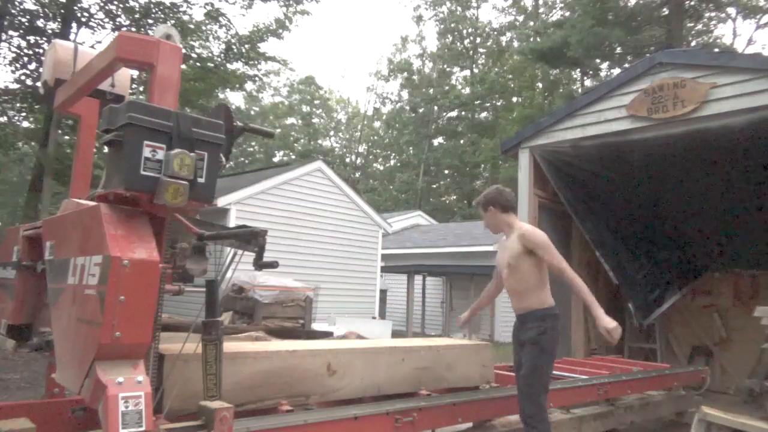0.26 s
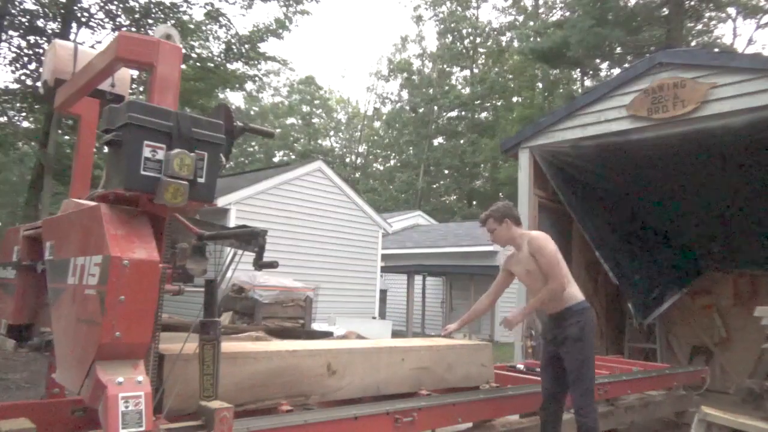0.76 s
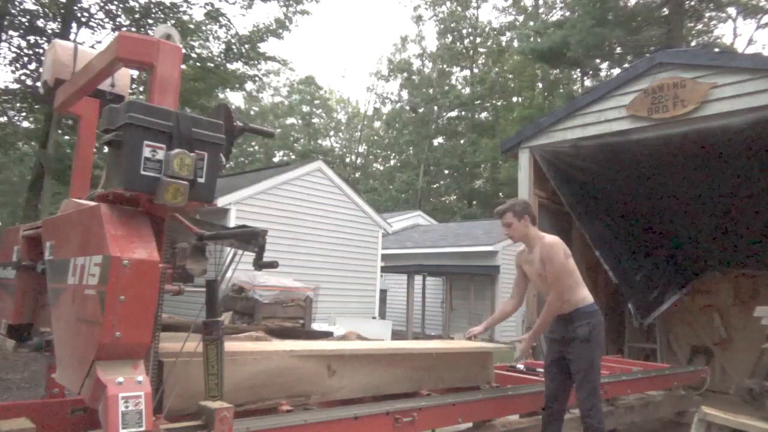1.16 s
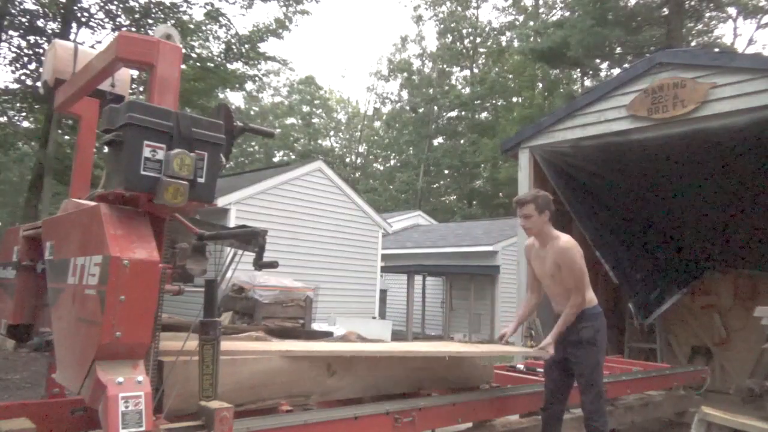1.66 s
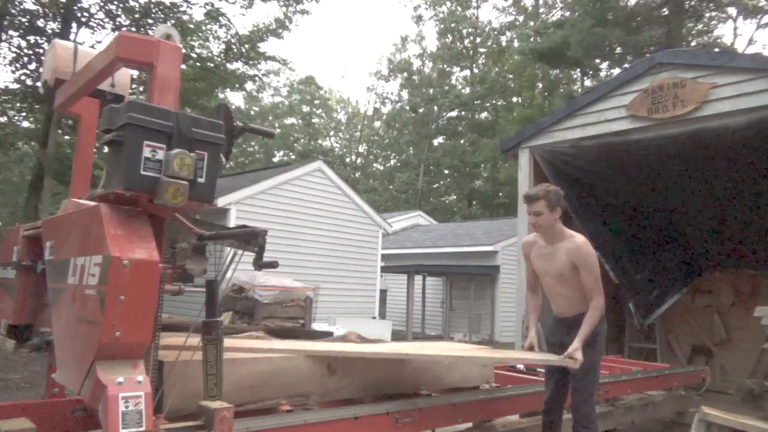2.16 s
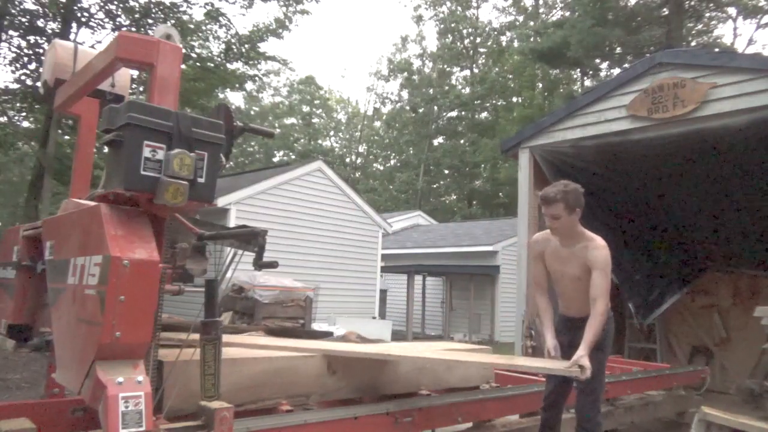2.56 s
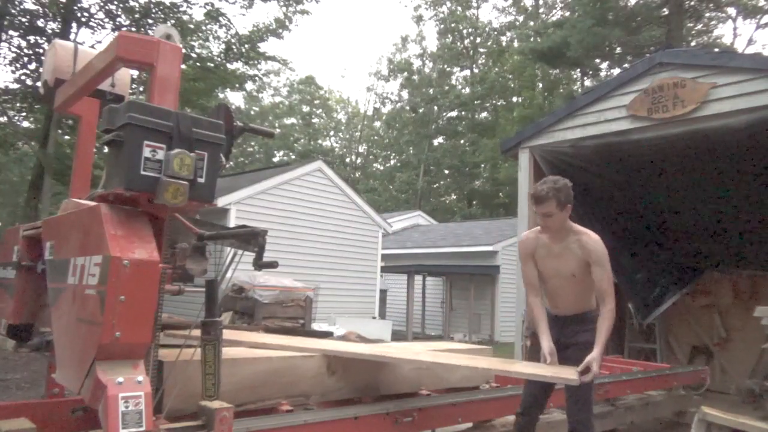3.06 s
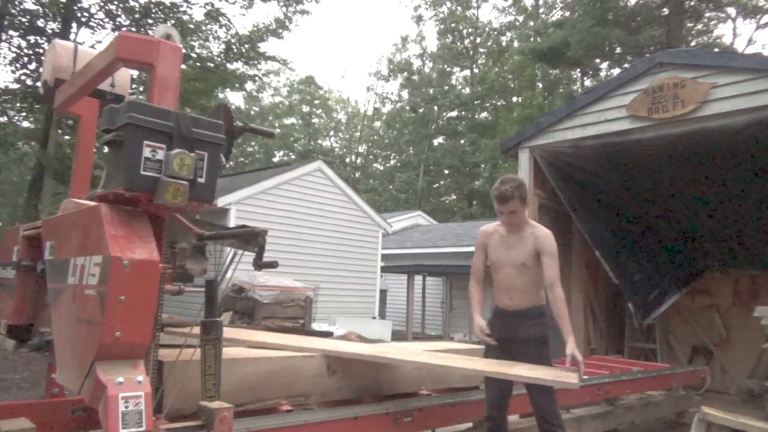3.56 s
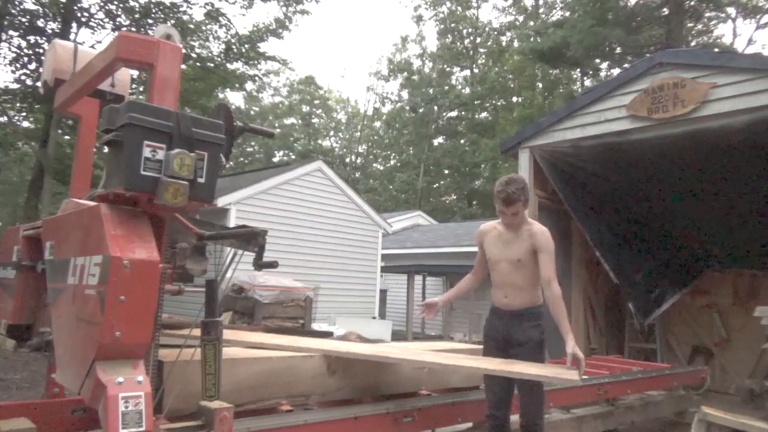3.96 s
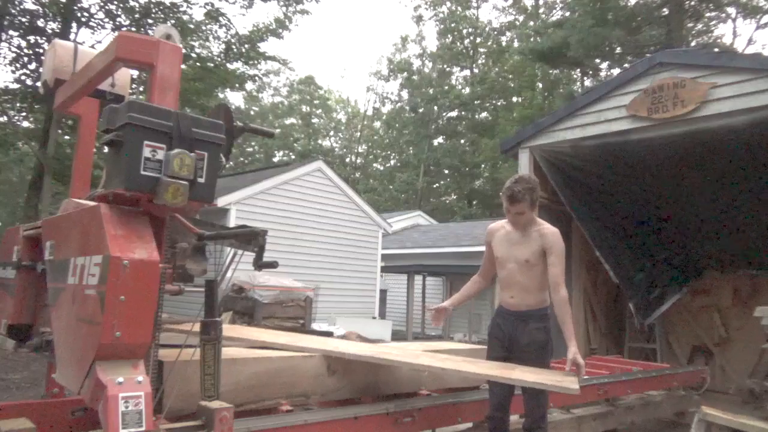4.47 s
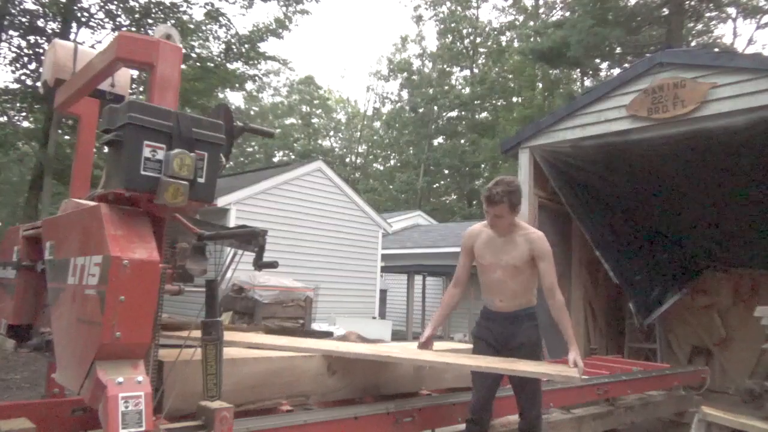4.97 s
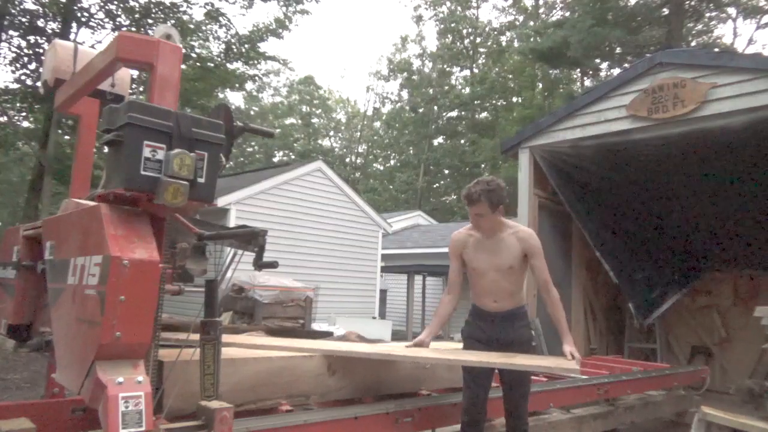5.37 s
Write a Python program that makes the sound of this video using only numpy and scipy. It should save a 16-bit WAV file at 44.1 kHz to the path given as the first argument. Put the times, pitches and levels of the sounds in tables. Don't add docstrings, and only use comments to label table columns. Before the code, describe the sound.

A bright airy blade hiss fades over about two and a half seconds while scattered metallic chirps squeak above a puttering, clattering petrol engine. The squeals crowd together, a slab of wood knocks once softly, and a brief lower chatter ends the blade's motion. Afterwards only the idling engine remains, its rattle slowly lifted by the camera's automatic level. Open yard, moderately close stereo microphone, sources left of centre, slight wall reflections, no deep bass or extreme treble.

```python
import sys
import numpy as np
from scipy import signal
from scipy.fft import rfft, irfft, next_fast_len
from scipy.io import wavfile
from scipy.ndimage import map_coordinates

SR = 44100
rng = np.random.default_rng(int(sys.argv[2]) if len(sys.argv) > 2 else 0)


def file_out(sig):
    cols = np.atleast_2d(sig).T
    lim = np.clip(cols, -1, 1)
    pcm = np.round(lim * 32767).astype(np.int16)
    wavfile.write(sys.argv[1], SR, pcm)


def boost_factor(decibels):
    exponent = np.asarray(decibels, float) / 20
    return 10 ** exponent


N = 247842

# t/s, rate/(four-stroke cycles per s)
ENGINE_SPEED = [
    (0, 16.52),
    (.56, 15.79),
    (1.12, 15.2),
    (1.5, 15.08),
    (2.0, 14.6),
    (2.3, 14.52),
    (3.36, 14.57),
    (3.66, 14.95),
    (5.62, 14.92),
]
# multiple of the cycle rate, level/dB
EXHAUST_ORDERS = [(6, -13.9), (8, -6.8), (10, 0.0), (11, -10.6), (12, -10.7), (15, -8.5), (16, -8.7),
                  (18, -9.4), (19, -10.6), (20, -10.1), (21, -6.4), (24, -6.5), (26, -10.8), (30, -8.8),
                  (32, -8.3), (46, -10.4), (52, -11.6), (55, -8.2), (56, -5.9), (60, -6.1),
                  (5, -19), (7, -25), (9, -22), (13, -19), (14, -22), (23, -14), (25, -11), (27, -17),
               (44, -12), (70, -8)]
# f/Hz, level/dB (per Hz)
CASING_COLOUR = [(35, -73), (60, -15), (145, 3), (195, -12), (222, -2.5), (303, -2.5), (504, -2.5),
                 (865, -3), (954, -1.5), (1040, -3), (1110, -2.5), (1580, -3.5), (3000, -8.5), (3900, -16),
                 (6600, -120)]
# f/Hz, width/Hz, level/dB
PANEL_MODES = [(312, 10, 1), (838, 24, 1), (896, 14, 1), (1045, 18, 5), (1152, 20, -2), (1269, 25, 0),
               (1411, 20, 0), (1523, 20, -1), (1618, 22, 2), (2270, 40, 1)]
# f/Hz, level/dB (per Hz)
VALVE_COLOUR = [(1500, -15), (2400, -6.5), (3000, -16.5), (3700, -5.5), (4300, 0), (5360, -2.5),
                (6800, -0.5), (8300, -3), (9600, -5.5), (11500, -14.5)]
# f/Hz, width/Hz, level/dB
FIN_MODES = [(3440, 40, -3), (4200, 110, 0), (4650, 25, 0), (5020, 30, -3), (5950, 40, -3), (6265, 40, -1),
             (6900, 240, -3)]
# f/Hz, likeness (0-1)
ENGINE_ALIKE = [(40, .6), (80, .85), (140, .88), (340, .87), (810, .89), (1920, .86), (4560, .84),
                (10800, .8)]
# f/Hz, left minus right level/dB
ENGINE_LEAN = [(40, 3.8), (140, 5.2), (300, 6.5), (600, 6.8), (1100, 4.8), (2000, 2.5), (4560, 2.5),
               (10800, 3.5)]
# t/s, length/s, f/Hz, level/dB
LOW_SQUEALS = [(.363, 0.011, 5770, -25), (0.408, 0.036, 5680, -20.5), (0.5, 0.018, 5720, -25),
               (0.546, 0.042, 5630, -21), (0.701, .034, 5675, -17.5), (0.813, 0.016, 5760, -23),
               (0.866, 0.038, 5660, -20.5), (1.05, 0.018, 5680, -21), (1.07, 0.025, 5650, -20.5),
               (1.129, 0.03, 5700, -26), (1.191, 0.031, 5670, -18.5), (1.248, 0.047, 5640, -19),
               (1.295, .035, 5660, -31), (1.349, 0.016, 5750, -17.5), (1.406, .036, 5680, -20),
               (1.497, 0.025, 5545, -13.5), (1.519, 0.04, 5600, -20.5), (1.542, 0.029, 5620, -29),
               (1.615, 0.016, 5840, -15.5), (1.702, 0.043, 5660, -16.5), (1.745, 0.025, 5610, -21),
               (1.811, 0.05, 5524, -15.5), (1.848, 0.019, 5620, -19), (1.866, 0.021, 5550, -13),
               (1.892, 0.035, 5700, -27), (2.012, .026, 5650, -14), (2.036, 0.028, 5600, -20.5),
               (2.176, 0.035, 5570, -21), (2.198, 0.039, 5553, -18.5), (2.234, 0.026, 5640, -13)]
# t/s, length/s, f/Hz, level/dB
HIGH_SQUEALS = [(.492, .019, 6030, -24), (0.64, .017, 6050, -19), (0.652, .015, 6580, -25),
                (0.799, .013, 6070, -20), (.94, 0.032, 6070, -32), (.979, 0.025, 6030, -23.5),
                (0.998, .022, 6540, -20.5), (1.173, 0.024, 6050, -23.5), (1.401, 0.04, 6130, -21),
                (1.435, .025, 6240, -28), (1.436, 0.015, 6430, -20), (1.568, 0.012, 6630, -18.5),
                (1.65, .02, 7150, -32), (1.674, 0.026, 6980, -21), (1.892, .018, 7070, -26),
                (1.927, 0.017, 6610, -15.5), (1.965, .018, 6740, -37), (2.008, 0.014, 6050, -20),
                (2.048, 0.023, 7000, -17.5), (2.106, 0.034, 6920, -19), (2.121, 0.013, 6930, -16),
                (2.116, 0.018, 6630, -21), (2.157, .05, 6830, -34), (2.272, 0.021, 6190, -16),
                (2.287, .026, 6610, -29), (1.83, .05, 3850, -40), (1.83, 0.06, 9600, -34),
                (1.837, 0.023, 2900, -37), (2.247, 0.016, 3750, -24), (2.252, 0.049, 1765, -36.5)]
# t/s, length/s, first f/Hz, last f/Hz, level/dB
SLIDES = [(.417, 0.02, 5950, 5650, -30), (.772, .016, 6200, 5780, -30), (1.12, .015, 6050, 5780, -26),
          (1.562, .012, 7200, 6670, -24), (1.689, 0.023, 6600, 5920, -20), (1.951, 0.018, 6200, 5770, -34),
          (1.996, 0.02, 5950, 5700, -24), (2.138, 0.025, 6840, 5700, -18), (2.165, .025, 6100, 5820, -22),
          (2.255, 0.039, 5690, 5850, -19.5), (2.206, 0.018, 4470, 4600, -38),
          (2.239, 0.03, 5860, 5960, -25), (2.28, .025, 4050, 4130, -37), (2.299, .025, 6630, 6320, -30)]
# t/s, f/Hz, level/dB
STOP_CHATTER = [
    (2.22, 1883, -52),
    (2.226, 1885, -36),
    (2.266, 1938, -21),
    (2.285, 2063, -31),
    (2.33, 2063, -42),
]
# multiple of its pitch, level/dB
CHATTER_OVERTONES = [(1, -2), (2, -25), (4, -6), (5, -11)]
# f/Hz, level/dB (per Hz)
HISS_COLOUR = [(300, -61), (1300, -18.5), (2200, -7), (3500, -9), (4200, -7), (4800, -6), (6000, 1.5),
               (7400, 0), (8300, 4), (9800, 5), (11500, 0.5)]
# f/Hz, width/Hz, level/dB
BLADE_MODES = [(3195, 35, 3), (3865, 50, 3), (4580, 50, 1), (4895, 35, 3), (5660, 110, 0), (6860, 120, -2),
               (7450, 35, -1), (8160, 200, 1), (8570, 60, 1), (9140, 80, 0), (9640, 40, -4)]
# t/s, peak level/dB
SLAB_KNOCKS = [
    (2.077, -27.5),
]
# f/Hz, level/dB, time to fall 60 dB/s
SLAB_MODES = [(150, 0, .09), (300, -10, .08), (350, 3.5, 0.084), (410, -2, 0.067)]
# f/Hz, time to fall 60 dB/s
YARD_DECAY = [(200, .35), (5600, .33), (9000, .2)]
# t/s, level/dB
CAMERA_GAIN = [
    (0, -6),
    (.12, -4.5),
    (.72, -3.5),
    (1.1, -1),
    (2.3, -0.5),
    (2.5, 1.5),
    (5.62, 11),
]


def unit(x):
    return x / np.sqrt(np.mean(x ** 2) + 1e-20)


def along(points, hz):
    f, value = np.transpose(points)
    return np.interp(np.log(hz + 1), np.log(f + 1), value)


def over_time(rows):
    s, value = np.transpose(rows)
    return np.interp(np.arange(N) / SR, s, value)


def wobble(rate):
    knots = rng.standard_normal(int(N * rate / SR) + 4)
    return map_coordinates(knots, [np.arange(N) * rate / SR])


def filtered(x, response):
    m = next_fast_len(N + SR // 2)
    return irfft(rfft(x, m) * response(np.fft.rfftfreq(m, 1 / SR)), m)[..., :N]


def colour(spectrum, modes, mode_db):
    def response(f):
        peaks = sum(boost_factor(2 * db) / (1 + (2 * (f - centre) / width) ** 2) for centre, width, db in modes)
        return boost_factor(along(spectrum, f)) * np.sqrt(1 + boost_factor(2 * mode_db) * peaks)
    return response


def spread(pair, alike, lean):
    def shares(hz):
        turn = np.arccos(np.clip(along(alike, hz), -1, 1)) / 2
        return np.array([np.cos(turn), np.sin(turn)])
    mid, side = filtered(pair, shares)
    return filtered(np.array([mid + side, mid - side]), lambda hz: boost_factor(np.outer([.5, -.5], along(lean, hz))))


def knocks(cycle, places, sharp):
    return sum(size * np.exp(sharp * (np.cos(2 * np.pi * (cycle - place)) - 1)) for place, size in places)


def exhaust(cycle):
    pipe, body = np.zeros((2, 2, N))
    for order, db in EXHAUST_ORDERS:
        k = round(order)
        phase = np.angle(1 + .9 * np.exp(-2j * np.pi * k * .59))
        phase += .02 * k * k - 2 * np.pi * k * .72
        drift = k * .012 * (wobble(6) + np.array([wobble(9), wobble(9)]))
        unsteady_db = (1 + .035 * k) * wobble(8)
        angle = 2 * np.pi * k * cycle + phase + drift + [[0], [1.5]]
        line = boost_factor(db + unsteady_db) * np.cos(angle)
        if k < 28:
            pipe = pipe + line
        else:
            body = body + line
    return unit(pipe), unit(body)


def casing(cycle):
    steps = round(SR / 15)
    pattern = rng.standard_normal((2, 14, steps))
    slot, age = cycle % 1 * (steps - 1), np.arange(N) / N * 12
    repeat = np.array([map_coordinates(p, [age, slot], order=1) for p in pattern])
    repeat = filtered(unit(repeat), lambda f: f ** 4 / (f ** 4 + 480 ** 4))
    beat = 2.7 + knocks(cycle, [(.22, 0.37), (.57, 0.46), (.92, 0.26)], sharp=6.7)
    shaking = beat * (0.61 * repeat + 1.19 * rng.standard_normal((2, N)))
    rattle = filtered(shaking, colour(CASING_COLOUR, PANEL_MODES, mode_db=3.0))
    rumble = filtered(rattle, lambda f: 1 / (1 + (f / 330) ** 4))
    return unit(rumble), unit(rattle - rumble)


def valve_gear(cycle):
    tick = 0.99 + boost_factor(3.0 * wobble(30)) * knocks(cycle, [(.07, 0.67), (.58, 0.36), (.85, 0.27)], sharp=7.1)
    return unit(filtered(tick * rng.standard_normal((2, N)), colour(VALVE_COLOUR, FIN_MODES, mode_db=5.5)))


def engine():
    idle = 14.95
    rate = over_time(ENGINE_SPEED)
    over = np.clip(rate - idle, 0, None)
    cycle = np.cumsum(rate) / SR - .09
    pipe, body = exhaust(cycle)
    rumble, rattle = casing(cycle)
    exhaust_db, clatter_db, valve_db = -43.5 - 5 * over, -34.5, -43.5 + 4 * over
    off_idle_db = 12 * np.abs(rate - idle)
    low = boost_factor(exhaust_db) * (boost_factor(-1.27) * pipe + boost_factor(-11.5) * rumble)
    clatter = boost_factor(-1.5) * rattle + boost_factor(-11.5 - off_idle_db) * body
    clatter = boost_factor(clatter_db + 0.082 * wobble(9.9)) * clatter
    valves = boost_factor(valve_db + 2) * valve_gear(cycle)
    return np.sqrt(2) * spread(low + clatter + valves, ENGINE_ALIKE, ENGINE_LEAN)


def slip(db, hz, tones, steady, waver_hz):
    knots = np.arange(len(hz)) * [[210], [160]] / SR
    shake = map_coordinates(rng.standard_normal((2, 60)), np.broadcast_arrays([[0], [1]], knots))
    turns = np.cumsum(hz + waver_hz * shake[1]) / SR
    wave = sum(boost_factor(g) * np.sin(2 * np.pi * round(k) * turns) for k, g in tones)
    return boost_factor(db + 7.0) * np.tanh(steady + shake[0]) * wave


def squeal():
    catch, swell_db, crest, fade_db, ring_out = 0.002, 4.5, 0.59, 8.5, 0.033
    cry, t = np.zeros(N), np.arange(SR // 8) / SR
    held = [(s, length, hz, hz, db) for s, length, hz, db in LOW_SQUEALS + HIGH_SQUEALS]
    for s, length, first_hz, last_hz, peak_db in held + SLIDES:
        left = np.clip(1 - t / length, 0, 1)
        hz = last_hz + (first_hz - last_hz) * left ** 2.1
        end = catch + length
        db = np.interp(t, [-catch / 2, catch, catch + crest * length, end, end + ring_out],
                       [-40, peak_db - swell_db, peak_db, peak_db - fade_db, -70])
        cry[round(s * SR):][:len(t)] += slip(db, hz, [(1, .5), (2, -11)], steady=1.5, waver_hz=50)
    s, hz, db = np.transpose(STOP_CHATTER)
    t = s[0] + t
    db = np.interp(t, s, db, right=-70)
    stop = slip(db, np.interp(t, s, hz), CHATTER_OVERTONES, steady=0.28, waver_hz=25)
    cry[round(s[0] * SR):][:len(t)] += stop
    cry = .3 * np.tanh(cry / .3)
    return filtered(cry, lambda f: f > 800)


def blade_rush():
    stop_s = 2.47
    speed = np.clip(1 - (np.arange(N) / SR / stop_s) ** 1.07, 0, 1)
    grit = boost_factor(0.8 * wobble(150) + wobble(12.47)) * rng.standard_normal((2, N))
    hiss = filtered(grit, colour(HISS_COLOUR, BLADE_MODES, mode_db=7))
    low_share = lambda f: 1 / (1 + (f / 6300) ** 8)
    low = boost_factor(-23 - 1.5) * speed * unit(filtered(hiss, low_share))
    high = boost_factor(-17 - 2.5) * speed ** 1.62 * unit(filtered(hiss, lambda f: 1 - low_share(f)))
    alike = [(3000, 0.85), (6000, 0.95), (9000, 0.65)]  # f/Hz, likeness
    lean = [(3000, 2.2), (6000, 5.0), (9000, 5.3)]  # f/Hz, left minus right level/dB
    return np.sqrt(2) * spread(low + high, alike, lean)


def slab():
    out, t = np.zeros(N), np.arange(SR // 5) / SR
    ring = sum(boost_factor(db - 60 * t / t60) * np.sin(2 * np.pi * hz * t) for hz, db, t60 in SLAB_MODES)
    for s, db in SLAB_KNOCKS:
        out[round(s * SR):][:len(t)] += boost_factor(db - 2) * ring * (1 - np.exp(-t / .003))
    return out


def yard(x):
    hz, t, z = signal.stft(rng.standard_normal((2, SR // 3)), SR, nperseg=256)
    tail = signal.istft(z * boost_factor(-60 * t / along(YARD_DECAY, hz)[:, None]), SR, nperseg=256)[1]
    late = np.pad(x, (300, 0))[None]
    return signal.fftconvolve(late, tail / np.linalg.norm(tail[0]), axes=1)[:, :N]


def scene():
    cry = squeal()
    to_the_left = boost_factor([[2], [-2.6]])
    return engine() + (cry + slab()) * to_the_left + blade_rush() + boost_factor(-10.0) * yard(cry)


def band_limit(x):
    return signal.sosfilt(signal.butter(12, 11440, fs=SR, output="sos"), x)


def record(dry):
    gained = dry * boost_factor(over_time(CAMERA_GAIN))
    mix = filtered(gained, lambda f: 1 / (1 + (f / 11035) ** 600))
    return band_limit(mix)


dry = scene()
out = record(dry)
file_out(out)
```